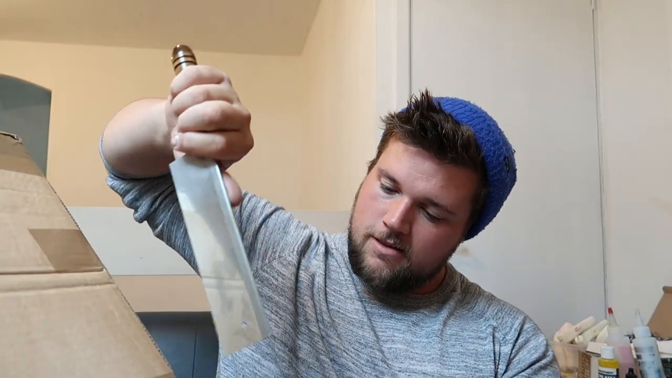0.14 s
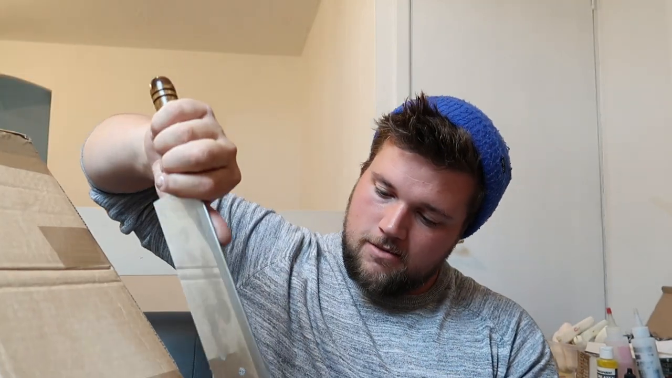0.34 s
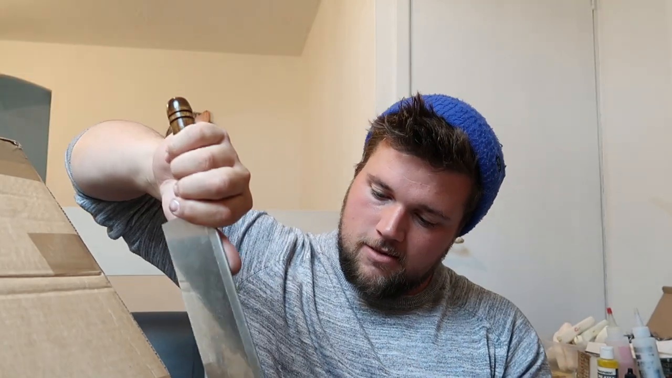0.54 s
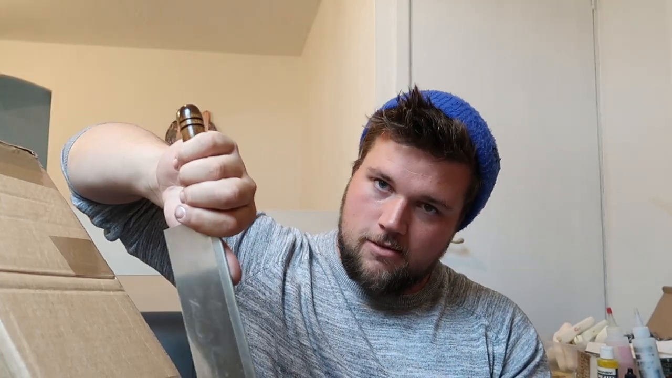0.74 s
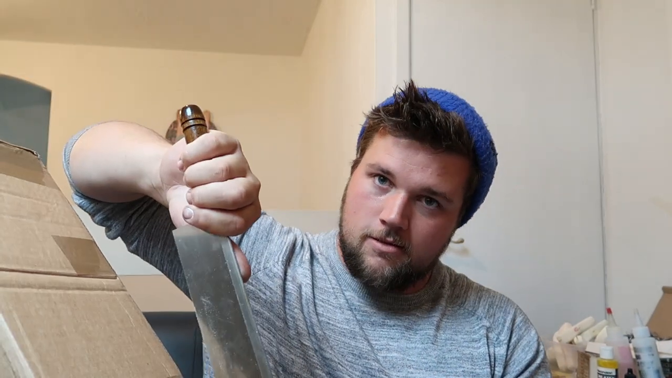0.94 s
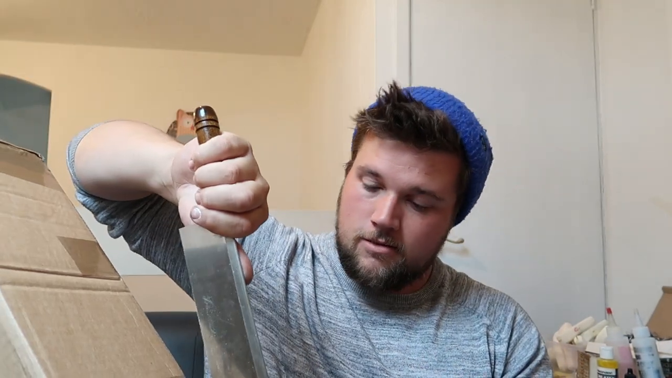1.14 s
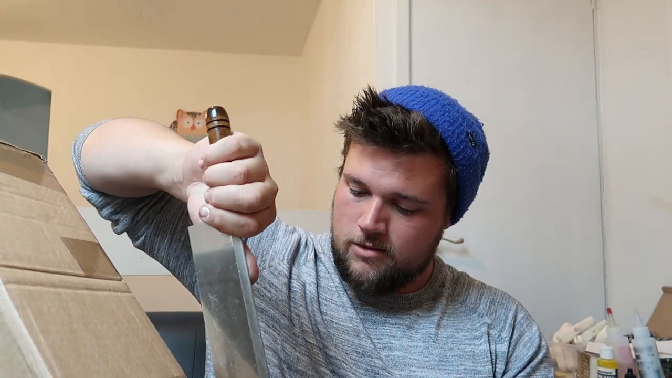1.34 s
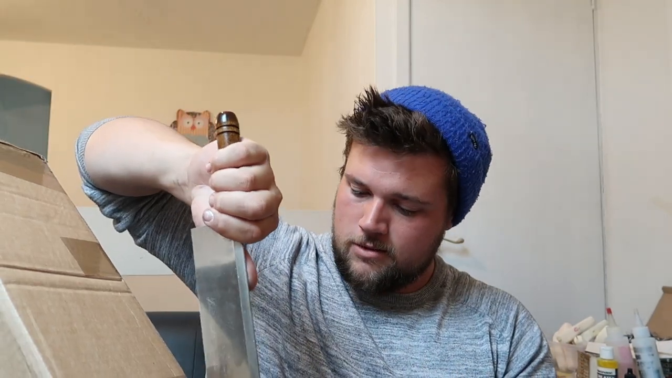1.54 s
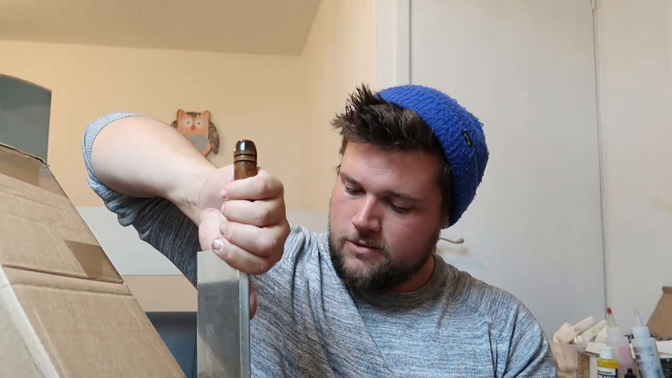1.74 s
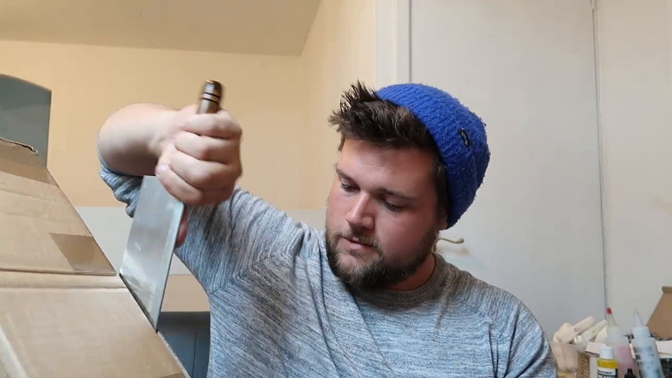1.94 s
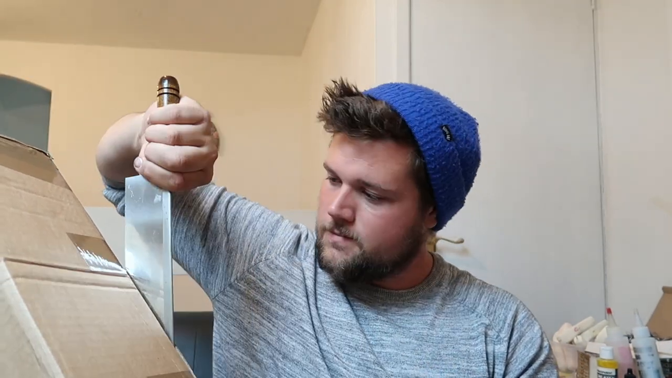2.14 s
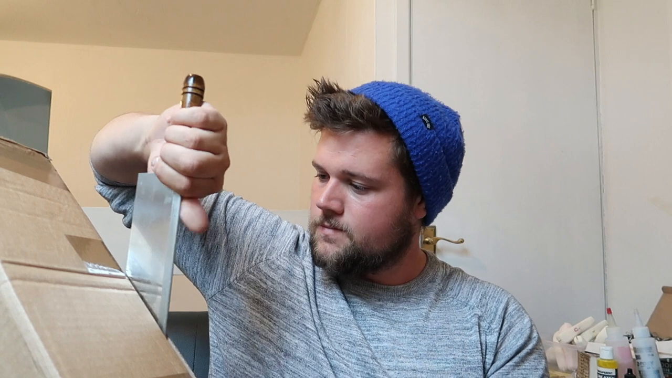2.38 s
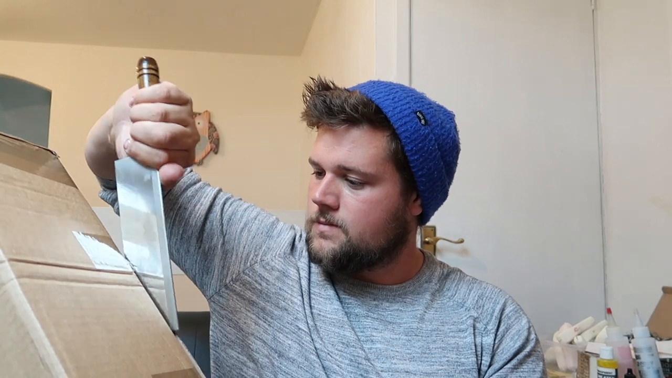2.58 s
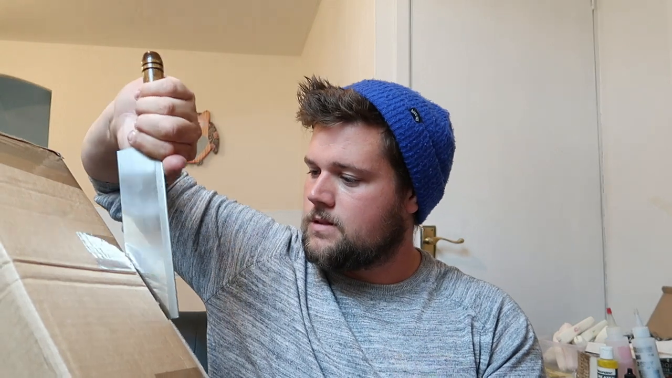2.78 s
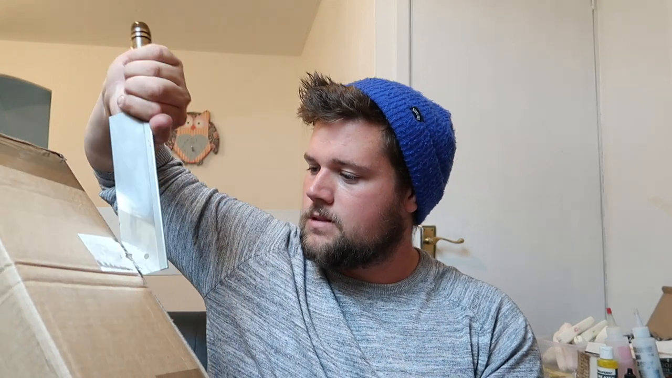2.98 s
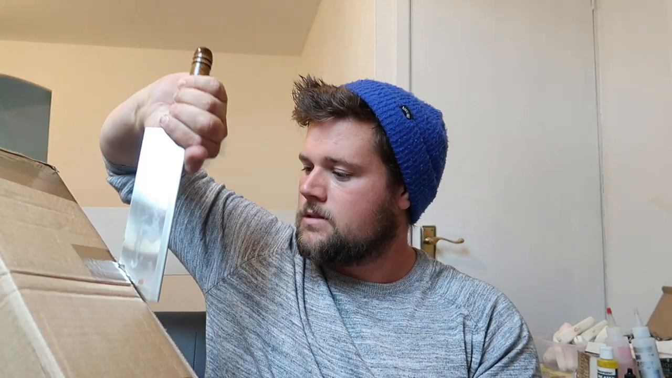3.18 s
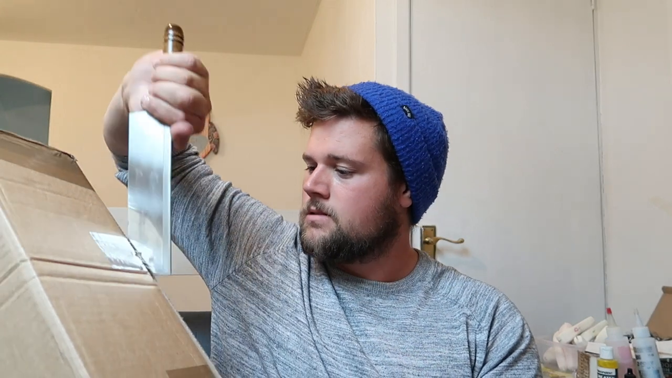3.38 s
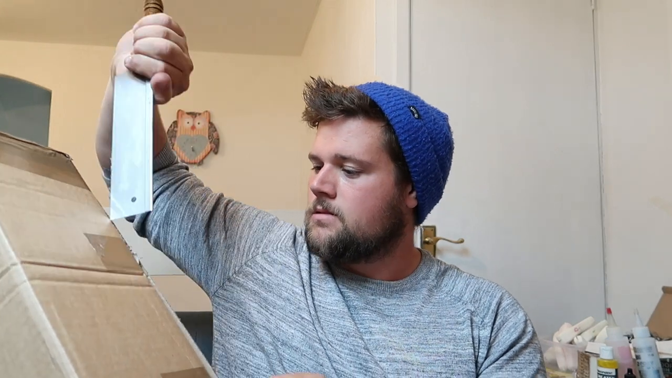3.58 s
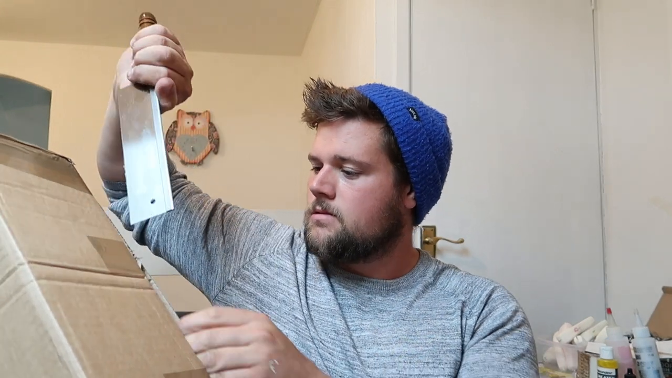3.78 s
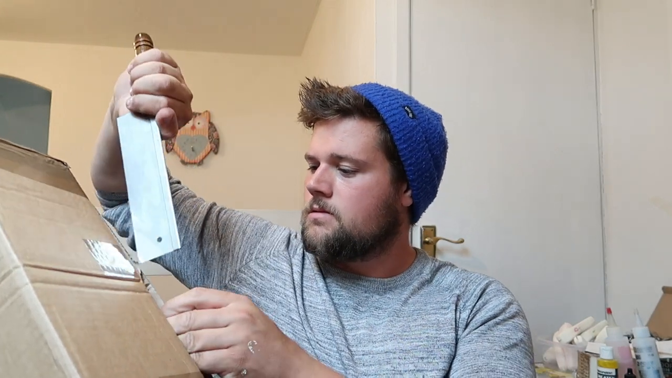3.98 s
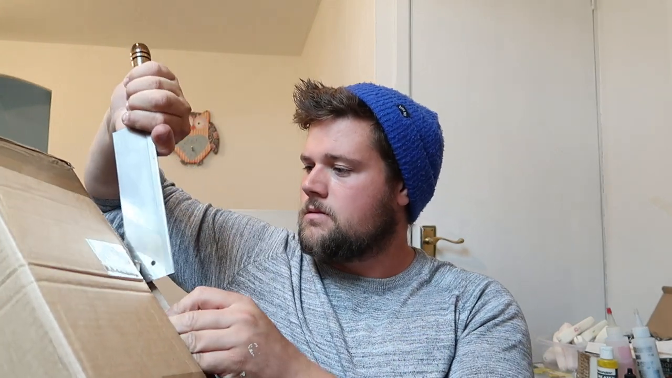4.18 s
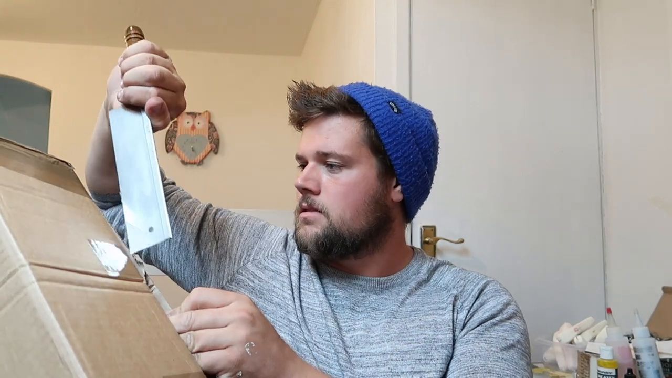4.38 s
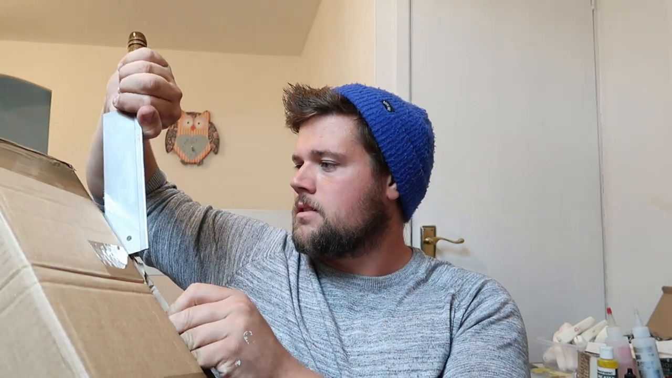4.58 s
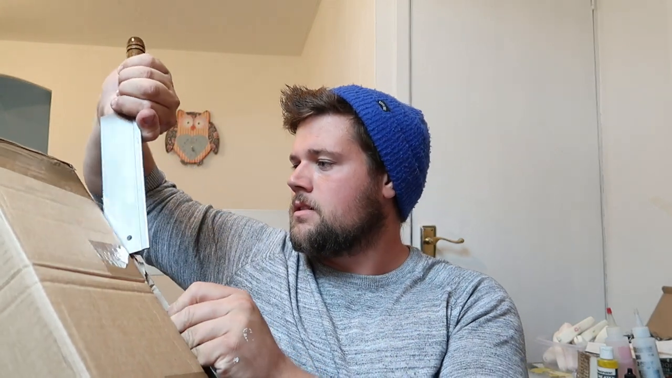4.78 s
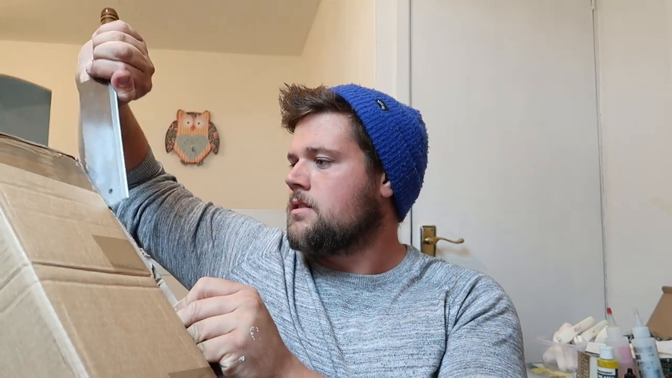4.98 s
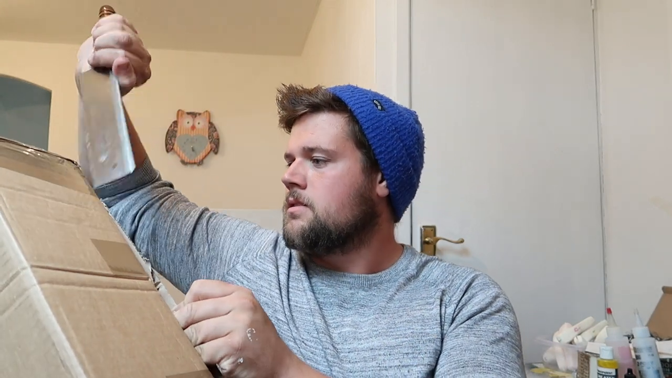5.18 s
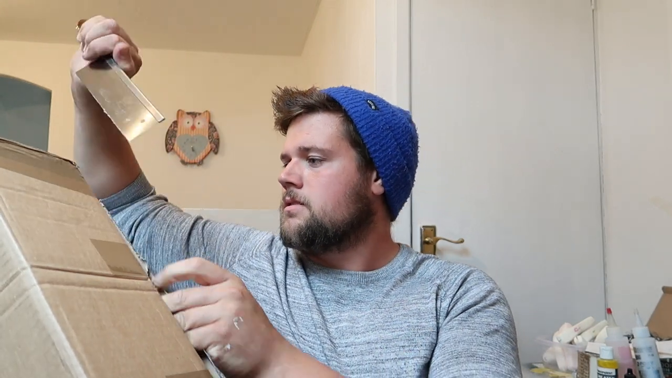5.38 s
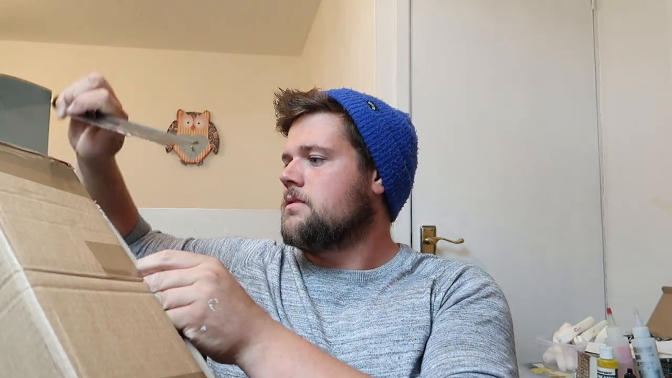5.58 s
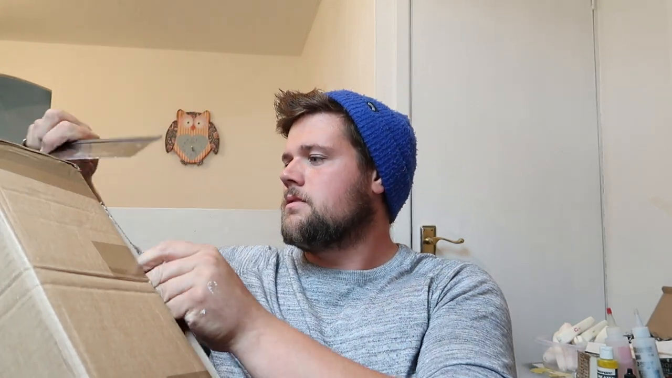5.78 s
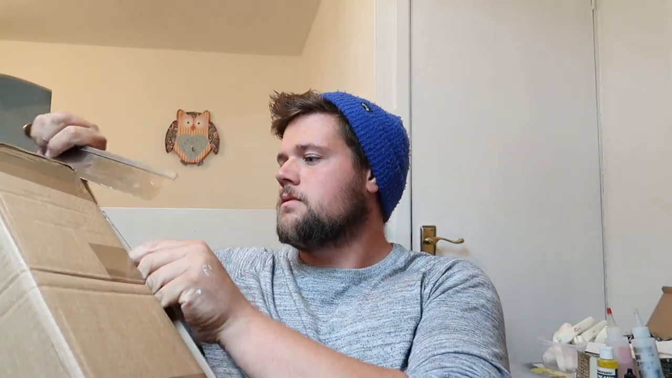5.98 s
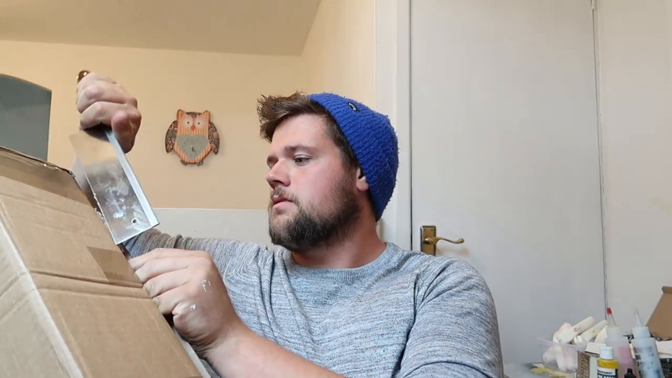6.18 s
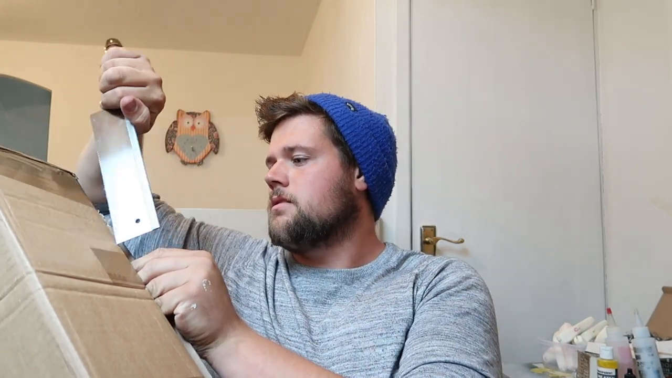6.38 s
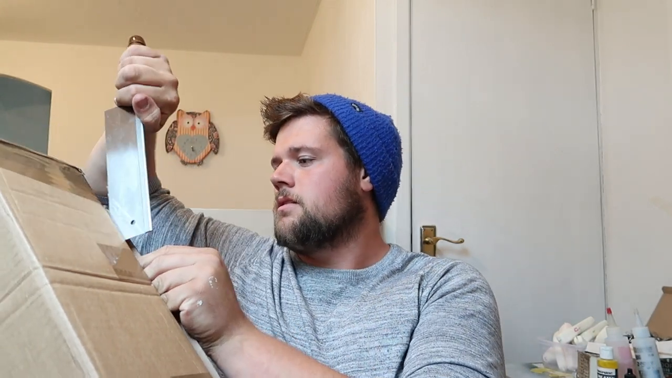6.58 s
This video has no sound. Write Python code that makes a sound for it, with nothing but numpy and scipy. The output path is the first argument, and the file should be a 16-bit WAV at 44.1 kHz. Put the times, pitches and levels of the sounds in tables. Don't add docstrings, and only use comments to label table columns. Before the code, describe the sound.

Dry, grainy scraping of steel on tape and stiff board, with the hollow box drumming underneath. Strokes are short and uneven, separated by knocks, plucked flaps, brief squeaks and snapping glue. The loudest cracks come around two and two and a half seconds; later strokes are lighter, with another strong run at five and a dull thump after six. Very close stereo pickup, short dull room tail, low air noise.

```python
import sys
import numpy as np
from scipy import signal
from scipy.fft import rfft, irfft, next_fast_len
from scipy.io import wavfile
from scipy.ndimage import uniform_filter1d

SR = 44100
rng = np.random.default_rng(int(sys.argv[2]) if len(sys.argv) > 2 else 0)


def store_wav(level_fs):
    pcm = np.round(np.clip(np.atleast_2d(level_fs), -1, 1) * 32767)
    wavfile.write(sys.argv[1], SR, pcm.T.astype(np.int16))


def how_loud(loudness_db):
    steps = np.asarray(loudness_db, float) / 20
    return 10 ** steps


N = 291942

# (frequency [Hz], width [Hz], level [dB])
BOX_MODES = [(128.2, 7.2, -1.5), (176, 7.2, 0), (215, 20.7, 1.5), (318, 56, -4), (346.7, 34.5, 2.5),
             (473, 33, -2.5)]
# (frequency [Hz], width [Hz], level [dB])
BOARD_MODES = [(512.5, 97, 1.5), (652, 116, -2), (759, 43, -3.5), (1065, 107, -2.5), (1214, 55, -8)]
# (frequency [Hz], width [Hz], level [dB])
EDGE_MODES = [(1505, 77, 14.5), (1598, 56, 17), (1839, 140, 10.5), (2024, 290, 13.5), (2450, 200, -1.5),
              (2852, 140, 12), (3330, 110, 3), (3600, 67, -22), (4784, 630, -28)]
# (frequency [Hz], level [dB], decay time t60 [s])
BLADE_MODES = [(887, 0, .34), (1217, -18, .12), (1588, -30, .06), (2245, -32, .08), (2923, -36, .1),
               (3338, -38, .04)]
# (frequency [Hz], level per Hz [dB])
TAPE_SPECTRUM = [(3000, -9.5), (4300, -3.5), (5600, 0), (7000, -4.5), (9000, -10), (12500, -12.5),
                 (14500, -31), (15800, -22)]
# (frequency [Hz], level per Hz [dB])
AIR_SPECTRUM = [(15, -34), (25, 8), (71, 0), (250, -1), (475, 0.5), (729, -7.5), (4750, -25.5),
                (5570, -26.5), (7680, -34), (11800, -36), (15000, -48)]
# (frequency [Hz], level [dB])
PORT_DIFFERENCE = [(60, -39), (170, -36), (350, -25), (700, -20), (1400, -19), (2800, -14), (5600, -3),
                   (10000, 6), (12000, 5), (14500, 1)]

# (peak time [s], rise [s], fall [s], edge scrape [dB], depth: extra push into the box [dB])
CUTS = [(0.0, .05, 0.021, -36, 17), (.03, 0.072, 0.17, -27, -21), (.085, 0.025, 0.09, -23.5, 8),
        (0.122, 0.1, 0.095, -22, 2), (.95, 0.038, 0.051, -25.5, -3.5), (1.722, 0.006, 0.24, -24.5, 2),
        (1.79, 0.1, 0.07, -22.5, -2), (1.93, 0.055, 0.098, -23, 0), (1.995, 0.015, 0.05, -28, 7),
        (2.036, 0.051, 0.055, -24.5, 3), (2.678, 0.13, 0.13, -28.5, 7), (2.901, 0.045, 0.23, -32, 7),
        (2.95, .08, 0.12, -26, 13), (3.011, 0.13, 0.054, -30, 13.5), (3.304, 0.047, 0.076, -27.5, 6.5),
        (3.485, 0.039, 0.14, -25.5, -3), (3.499, 0.038, 0.023, -32.5, 10), (2.637, .008, .12, -34, 8),
        (3.6, 0.36, 0.17, -33.5, 6), (4.685, 0.092, 0.069, -33, 8), (4.914, 0.015, 0.14, -30, 5.5),
        (4.975, 0.081, 0.098, -28, 13), (5.02, 0.072, 0.13, -22, 4), (5.06, 0.12, 0.055, -27.5, 12),
        (5.11, 0.14, .055, -24, -2)]
# (peak time [s], rise [s], fall [s], scrape level [dB], depth [dB])
SLIDES = [(.37, 0.15, 0.11, -27.5, -17.5), (.5, 0.068, 0.16, -40.5, 1), (0.611, 0.069, 0.045, -38.5, -2),
          (.775, 0.083, .12, -36.5, 0), (.83, 0.073, 0.053, -34.5, -1), (1.358, 0.016, 0.19, -41.5, -3),
          (1.598, 0.054, 0.059, -35, 2), (2.161, 0.18, 0.15, -34.5, -2.5), (2.37, 0.085, 0.31, -39.5, 0),
          (3.169, 0.053, 0.091, -45, -7), (3.889, 0.58, 0.23, -35.5, -23), (4.159, 0.072, 0.37, -37, -10),
          (4.26, 0.13, .05, -38.5, 1.5), (4.295, 0.035, 0.045, -25, -14), (4.35, 0.084, 0.2, -40, 5),
          (4.454, 0.16, 0.051, -31, -7.5), (5.238, 0.027, 0.077, -43, 9.5),
          (5.449, 0.098, 0.45, -37.5, -26), (5.68, 0.59, 0.086, -44, -5), (5.929, 0.22, 0.28, -45.5, -1.5),
          (6.16, .06, .08, -44.5, -18), (6.26, .05, 0.091, -46, 11.5), (6.305, 0.06, 0.05, -41, -4),
          (6.531, 0.034, 0.048, -34, -9)]
# (time [s], edge scrape [dB], depth [dB])
JABS = [(.609, -41, -1), (.747, -42, 1), (0.88, -35.5, -2), (1.117, -60, 28), (1.481, -55, 21),
        (1.545, -55, 1), (1.722, -30, 2), (3.758, -56, 21.5), (4.612, -47, 1), (4.645, -38, 5),
        (1.9, -30, 7), (1.238, -44, 12), (1.66, -27.5, 2.5), (1.694, -50, 16), (2.552, -24, 7),
        (4.043, -51, 12.5), (3.282, -34, -4), (3.45, -32.5, 11), (4.567, -46, 16.5), (5.401, -45, 5),
        (6.519, -35, -2), (6.21, -30, 18)]
# (time [s], favoured box mode [Hz], favoured edge mode [Hz])
CONTACT_POINT = [(0.0, 235, 2100), (.13, 235, 1800), (.35, 215, 2130), (.64, 190, 1630), (.81, 232, 2700),
                 (.95, 344, 1780), (1.2, 172, 1560), (1.35, 215, 2420), (1.82, 204, 2160),
                 (2.01, 332, 1930), (2.36, 176, 1800), (2.51, 328, 2220), (2.75, 201, 2400),
                 (3.5, 202.3, 2060), (3.8, 215, 2300), (4.7, 215, 2160), (5.16, 294, 1680),
                 (6.2, 200, 2000)]
# (time [s], tape hiss relative to edge scrape [dB])
TAPE_UNDER_EDGE = [(0.0, -9.5), (.3, -21.5), (.43, -4), (.62, -17.5), (.83, -10), (.95, -33), (1.3, -29),
                   (1.62, -15.5), (1.72, -5), (1.8, -5), (2.04, -13), (2.9, -5), (3.6, -13), (3.85, -2),
                   (4.3, -12.5), (5.05, -6.5), (6.1, -8), (6.22, -18)]
# (time [s], change of its level [dB])
TOP_WHISPER = [(0.0, -6), (.2, -4), (.45, 0), (.8, 1), (1.2, 0), (1.75, 2), (1.85, -5), (2.0, 0), (2.2, -3),
               (2.9, -2), (3.5, -1), (3.85, 2), (4.3, -4), (4.7, 0), (5.05, 2), (5.5, 3), (6.0, 0), (6.5, 7)]
# (time [s], level [dB])
ROCKS = [(.125, -21), (.41, -41.5), (.72, -38.5), (1.12, -45.5), (1.6, -39.5), (1.8, -30.5), (1.95, -23),
         (2.711, -25), (3.02, -41), (3.32, -31.5), (3.5, -39), (3.75, -44), (4.26, -41.5), (4.64, -37),
         (5.02, -30), (6.25, -43)]
# (time [s], frequency [Hz], peak level [dB], decay time t60 [s])
PINGS = [(.083, 700, -9, .06), (.071, 430, -15, .06), (.703, 1100, -30, .04), (.744, 2900, -29, .03),
         (.755, 1700, -28, .04), (.773, 900, -20, .16), (.771, 2900, -26, .05), (.78, 1900, -31, .08),
         (.802, 3800, -23, .05), (.800, 2600, -24, .05), (.806, 3200, -25, .04), (.815, 3450, -22, .05),
         (.816, 2900, -23, .05), (.835, 2600, -26, .04), (.003, 235, -15, .1), (1.898, 200, -18, .15),
         (1.985, 330, -6, .05), (6.212, 195, -14, .13), (6.209, 420, -12, .05), (6.522, 1590, -36, .08),
         (2.882, 220, -20, .15), (2.917, 240, -12, .12), (.877, 3400, -28, .05), (.877, 900, -28, .08),
         (.878, 2400, -30, .05), (.948, 2850, -22, .04), (.951, 750, -16, .04), (1.352, 2450, -34, .05),
         (1.357, 3400, -34, .08), (1.358, 1050, -33, .12), (1.376, 2350, -33, .07), (1.478, 2350, -41, .1),
         (1.476, 3050, -42, .07), (3.485, 2400, -20, .04), (4.206, 2000, -32, .15), (4.216, 2800, -29, .05),
         (4.432, 2900, -29, .06), (4.455, 2150, -22, .04), (4.465, 500, -30, .15), (4.619, 3300, -34, .04),
         (4.642, 750, -31, .08), (4.692, 2250, -26, .06), (6.207, 660, -13, .06), (6.206, 1620, -22, .05),
         (6.236, 400, -24, .1)]
# (time [s], crack peak [dB], box thump peak [dB], panel slap peak [dB])
KNOCKS = [(0.0867, -30, -16, -12), (0.7024, -42, -32, -26), (0.7452, -24, -31, -31),
          (0.7729, -28, -30, -28), (0.816, -28, -38, -22.5), (0.875, -35, -42, -21),
          (0.9243, -34, -39, -24), (1.1207, -48, -34, -39), (1.235, -54, -35, -26.5),
          (1.3494, -31, -60, -28), (1.5422, -53, -47, -31), (1.6571, -14.5, -26, -40),
          (1.702, -18, -30, -38), (1.7176, -20, -20, -33), (1.9248, -0.5, -26, -3), (1.9834, -24, -20, -22),
          (2.504, -27, -35, -38), (2.5496, -5, -24, -11), (2.8832, -39, -30, -26), (3.2808, -28, -37, -25),
          (3.308, -32, -25, -30), (3.4445, -34, -23, -30), (3.485, -15, -27, -28),
          (4.0345, -38, -55, -26.5), (4.5617, -38, -28, -32), (4.6098, -32, -29, -26),
          (4.9064, -19, -27, -35), (5.3972, -38, -31.5, -36), (6.2069, -39, -14, -7.5),
          (6.2092, -30, -8, -12)]
# (time [s], length [s], frequency [Hz], level [dB])
SQUEAKS = [(0.369, 0.065, 1360, -31), (0.36, 0.066, 2500, -32), (0.37, 0.049, 760, -33.5),
           (.115, .03, 230, -14), (.118, .025, 480, -25), (3.496, .03, 205, -9.5), (3.575, .05, 205, -24),
           (4.975, .035, 215, -16), (5.04, .02, 215, -16), (5.065, .03, 340, -16), (.835, .02, 5500, -41),
           (3.311, .014, 235, -17), (2.66, .04, 260, -24), (2.72, .03, 200, -24), (2.155, .03, 600, -33),
           (3.54, .05, 530, -29), (3.6, .05, 1020, -33), (4.165, .04, 500, -36), (4.15, .04, 2050, -38),
           (4.16, .03, 1200, -38), (4.385, .03, 1050, -39), (4.38, .04, 480, -35), (4.675, .035, 205, -24),
           (4.51, .03, 1950, -41), (1.595, .02, 1100, -33), (1.595, .025, 1850, -36),
           (1.487, .02, 210, -35), (2.97, .05, 560, -24), (.95, 0.028, 810, -28.5),
           (0.955, 0.061, 2740, -39.5), (1.124, 0.021, 1090, -44), (1.415, 0.025, 1150, -39),
           (.85, 0.027, 1100, -35), (1.757, 0.037, 755, -23.5), (1.77, 0.051, 2220, -28),
           (2.68, 0.078, 3300, -34), (2.9, 0.042, 2900, -35), (3.3, 0.064, 546, -31),
           (3.63, 0.035, 520, -23), (4.24, 0.045, 2000, -38), (4.287, 0.03, 2660, -27),
           (4.286, 0.02, 1540, -28), (4.457, 0.071, 2070, -35), (4.571, 0.012, 2780, -39.5),
           (5.012, 0.11, 1584, -25.5), (6.231, 0.042, 547, -33), (6.481, 0.0033, 2150, -42),
           (6.491, .004, 2400, -51), (6.534, 0.013, 3320, -37), (6.536, 0.021, 1170, -35)]
# (time [s], peak level [dB])
TICKS = [(0.606, -49), (.745, -46), (.8, -36), (1.102, -44), (1.233, -28.5), (1.35, -47), (2.505, -40),
         (2.552, -20), (3.448, -31), (3.485, -24), (4.565, -39), (4.611, -44), (4.622, -41), (4.642, -39),
         (4.91, -36)]
# (time [s], level [dB])
BLADE_TAPS = [
    (1.352, -38),
    (4.566, -38),
    (6.537, -25),
]


def rms_one(x):
    return x / np.sqrt(np.mean(x ** 2) + 1e-20)


def even(x):
    power = uniform_filter1d(uniform_filter1d(x[0] ** 2, size=1800), size=1800)
    return x / np.sqrt(power + 1e-20)


def shaped(x, points):
    size = next_fast_len(N)
    hz = np.maximum(np.arange(size // 2 + 1) * SR / size, 1)
    table_hz, table_db = np.transpose(points)
    gain = how_loud(np.interp(np.log(hz), np.log(table_hz + 1), table_db))
    return irfft(rfft(x, size) * gain, size)[..., :N]


def band(x, low_hz, high_hz, order=2):
    sos = signal.butter(order, [low_hz, min(high_hz, SR / 2.2)], "band", fs=SR, output="sos")
    return signal.sosfilt(sos, x)


def drift(rate):
    r = np.exp(-2 * np.pi * rate / SR)
    wander = signal.lfilter([1], [1, -2 * r, r * r], rng.standard_normal(N + SR))
    return rms_one(wander[SR:])


def in_time(rows):
    s, *columns = np.transpose(rows)
    return [np.interp(np.arange(N) / SR, s, c) for c in columns]


def swells(rows):
    s, rise_s, fall_s, db = np.transpose(rows)[:, :, None]
    t = np.arange(0, N + 32, 32) / SR
    away = np.where(t < s, (s - t) / rise_s, (t - s) / fall_s)
    level_db = db - 23 * away ** 1.132
    power = np.sum(how_loud(level_db) ** 2, axis=0)
    return np.interp(np.arange(N) / SR, t, 10 * np.log10(power + 1e-12))


def effort(depth_share):
    rise_s, fall_s = 0.0067, 0.035
    jabs = [(s, rise_s, fall_s, db, depth_db) for s, db, depth_db in JABS]
    strokes = CUTS + SLIDES + jabs
    return swells([(s, rise, fall, db + depth_share * depth_db) for s, rise, fall, db, depth_db in strokes])


def resonate(x, peaks, centre_hz=None, fall_db=0, patchy_db=0):
    out = 0
    for k, (hz, width_hz, level_db) in enumerate(peaks):
        r = np.exp(-np.pi * width_hz / SR)
        gain = (1 - r * r) / 2 * how_loud(level_db) * (-1) ** k
        drive = x
        if centre_hz is not None:
            octaves_off = np.abs(np.log2(hz / centre_hz))
            drive = x * how_loud(patchy_db * drift(4.7) - fall_db * octaves_off)
        poles = [1, -2 * r * np.cos(2 * np.pi * hz / SR), r * r]
        out = out + signal.lfilter([gain, 0, -gain], poles, drive + 1e-18)
    return out


def slips(per_s, spread_db, clump_db):
    sizes = how_loud(spread_db * np.minimum(rng.exponential(1, N), 5) + clump_db * drift(31.6))
    grains = sizes * (rng.random(N) < per_s / SR)
    return rms_one(grains * rng.choice([-1, 1], (2, N)))


def blade(force):
    modes = [(hz, np.log(1000) / np.pi / t60, db) for hz, db, t60 in BLADE_MODES]
    return resonate(force, modes)


def sawing():
    box_db, board_db, edge_db = effort(0.99), effort(0.3) - 0.22, effort(0)
    tape_db = edge_db + in_time(TAPE_UNDER_EDGE)[0]
    box_hz, edge_hz = in_time(CONTACT_POINT)

    coarse = slips(per_s=2000, spread_db=1.5, clump_db=4.0)
    fine = coarse + 1.26 * slips(per_s=9000, spread_db=2.0, clump_db=2.5)
    fibres = slips(per_s=7000, spread_db=2.0, clump_db=1.5)

    drum = even(resonate(coarse, BOX_MODES, box_hz, fall_db=16.0, patchy_db=4.5))
    drum = drum + 0.2 * rms_one(band(coarse, 102, 630))
    rasp = even(resonate(coarse, BOARD_MODES, 820, fall_db=6, patchy_db=0.5))
    rasp = rasp + 1.03 * rms_one(band(fine, 382, 2000))
    scrape = even(resonate(fine, EDGE_MODES, edge_hz, fall_db=9.0, patchy_db=1.5))
    scrape = scrape + 1.255 * rms_one(band(fine, 1180, 4900))

    out = how_loud(box_db) * even(band(drum, 97, 386))
    out += how_loud(board_db) * even(band(rasp, 373, 1186))
    out += how_loud(edge_db) * even(band(scrape, 1410, 3630))
    out += how_loud(tape_db) * even(shaped(fibres, TAPE_SPECTRUM))
    sheen_db = tape_db - 17.5 + in_time(TOP_WHISPER)[0] - 0.29 * (box_db - edge_db)
    out += how_loud(sheen_db) * even(band(fibres, 11140, 15400))
    return out + blade(how_loud(board_db + 4) * fine)


def shifting():
    rise_s, fall_s, rest_db = 0.15, 0.13, -54
    rocking = how_loud(swells([(s, rise_s, fall_s, db) for s, db in ROCKS])) + how_loud(rest_db)
    return rocking * even(band(slips(per_s=240, spread_db=1.0, clump_db=12.0), 62, 185))


def air():
    noise = rms_one(shaped(rng.standard_normal((2, N)), AIR_SPECTRUM))
    return how_loud(-46.5) * noise * how_loud(np.array([[0], [5]]))


def pings():
    size = 8000
    out, t = np.zeros((2, N + size)), np.arange(size) / SR
    for s, hz, peak_db, t60 in PINGS:
        at = round(s * SR)
        shape = (1 - np.exp(-t / 0.0012)) * how_loud(peak_db - 60 * t / t60)
        out[:, at:at + size] += shape * np.sin(2 * np.pi * hz * t)
    return out[:, :N]


def room(x):
    t60, first_s = 0.28, 0.004
    t = np.arange(SR // 2) / SR
    tail = band(rng.standard_normal((2, len(t))), 286, 8400, order=1)
    tail = tail * how_loud(-60 * t / t60) * (t > first_s)
    tail /= np.sqrt(np.sum(tail ** 2, axis=1, keepdims=True))
    return signal.fftconvolve(x[:1], tail, axes=1)[:, :N]


def knocks():
    size = 4000
    out, t = np.zeros((2, N + size)), np.arange(size) / SR
    dull_box = [(hz, width_hz * 3, db) for hz, width_hz, db in BOX_MODES]
    edge_hz = in_time(CONTACT_POINT)[1]
    for s, crack_db, thump_db, slap_db in KNOCKS:
        at = round(s * SR)
        burst = rng.standard_normal((2, size))
        hz = edge_hz[at]
        snap = burst * (np.exp(-t / 0.002) + 0.15 * np.exp(-t / 0.012))
        crack = band(snap, hz * 0.45, hz * 1.27) + 0.06 * band(snap, 3200, 7000)
        thump = resonate((burst + 1) * np.exp(-t / 0.00097), dull_box)
        slap = band(burst * np.exp(-t / 0.0048), 288, 1156)
        for part, peak_db in (crack, crack_db), (thump, thump_db + 0.5), (slap, slap_db):
            out[:, at:at + size] += how_loud(peak_db) * part / np.abs(part[0]).max()
    return out[:, :N]


def squeaks():
    steady = 0.6
    out, rub = np.zeros((2, N)), slips(per_s=1200, spread_db=1.5, clump_db=3.0)
    for s, length_s, hz, level_db in SQUEAKS:
        size = round(2 * length_s * SR)
        at = round(s * SR) - size // 2
        sung = resonate(rub[:, at:at + size], [(hz, 30 + 0.05 * hz, 0)])
        sung = sung / (np.abs(signal.hilbert(sung)) + 1e-9) ** steady
        sung = resonate(sung, [(hz, 60 + 0.15 * hz, 0)])
        out[:, at:at + size] += how_loud(level_db) * rms_one(sung) * np.hanning(size)
    return out


def ticks():
    size = 1500
    out, t = np.zeros((2, N)), np.arange(size) / SR
    for s, peak_db in TICKS:
        at = round(s * SR)
        burst = rng.standard_normal((2, size)) * np.exp(-t / 0.001)
        tick = band(burst, 2000, 6600, order=3)
        out[:, at:at + size] += how_loud(peak_db) * tick / np.abs(tick[0]).max()
    return out


def blade_taps():
    force = np.zeros((2, N))
    for s, level_db in BLADE_TAPS:
        force[:, round(s * SR)] = how_loud(level_db + 60)
    return blade(force)


def scene():
    near = sawing() + shifting() + pings() + knocks() + squeaks() + ticks() + blade_taps()
    both, apart = near + how_loud(-13) * room(near) + air()
    apart = shaped(apart, PORT_DIFFERENCE)
    return np.array([both + apart, both - apart])


def roll_off(x):
    return signal.sosfilt(signal.butter(12, 16440, fs=SR, output="sos"), x)


def record(dry):
    rounded = 1.6 * np.tanh(dry / 1.6)
    top_cut = signal.cheby2(10, 60, 16600, fs=SR, output="sos")
    mix = signal.sosfilt(top_cut, rounded)
    return roll_off(mix)


dry = scene()
out = record(dry)
store_wav(out)
```